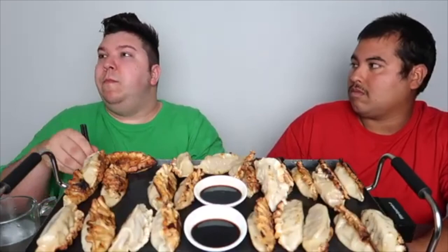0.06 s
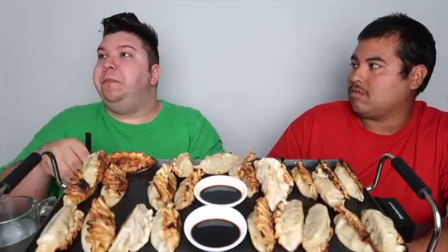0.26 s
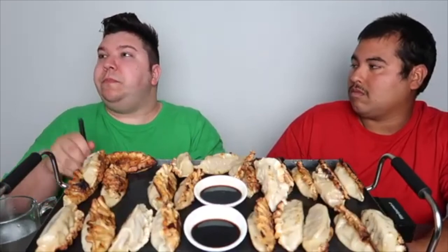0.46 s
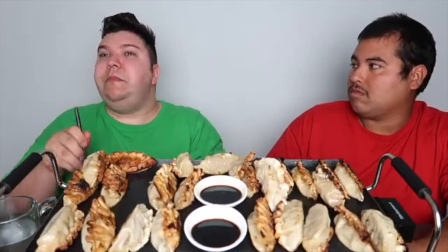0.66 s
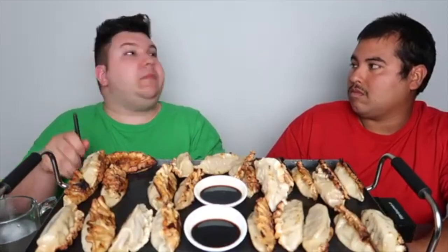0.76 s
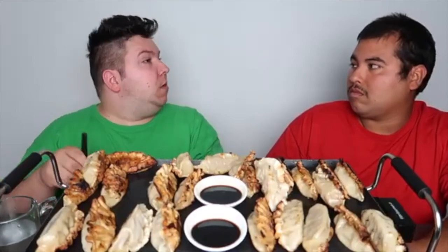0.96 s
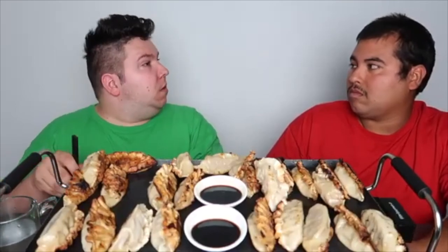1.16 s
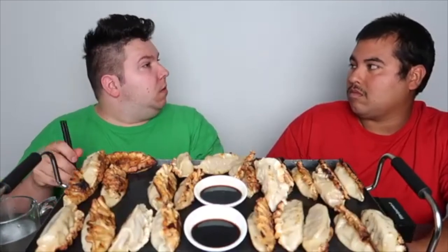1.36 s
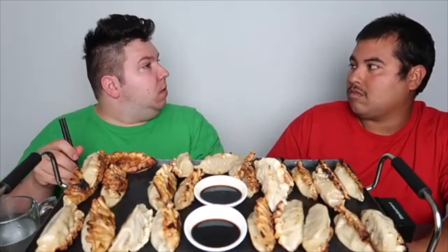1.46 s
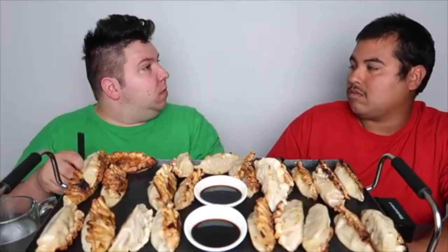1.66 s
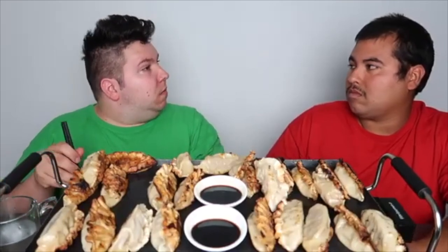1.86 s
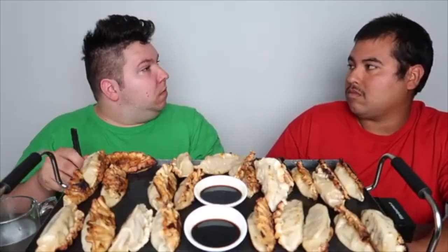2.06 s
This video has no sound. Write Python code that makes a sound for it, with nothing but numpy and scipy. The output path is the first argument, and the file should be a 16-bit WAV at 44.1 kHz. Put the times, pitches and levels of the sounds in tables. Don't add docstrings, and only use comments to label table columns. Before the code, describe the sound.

Chopsticks rapped on a dish, hollow clacks with a table thump in a small bare room

```python
import sys
import numpy as np
from scipy import signal
from scipy.fft import rfft, irfft, next_fast_len
from scipy.io import wavfile
from scipy.ndimage import uniform_filter1d

SR = 44100
rng = np.random.default_rng(int(sys.argv[2]) if len(sys.argv) > 2 else 0)


def log_audio(samples):
    frames = np.atleast_2d(samples).T
    limited = np.clip(frames, -1, 1)
    pcm = np.round(limited * 32767).astype(np.int16)
    wavfile.write(sys.argv[1], SR, pcm)


def voltage_ratio(level):
    return 10 ** (np.asarray(level, float) / 20)


N = 92610
EARLY = SR // 5
GRAZE_S = 0.006
STRIKE_SIZE = 8192


def evened(x):
    return x / np.sqrt(np.sum(x ** 2) + 1e-20)


def read(points, hz):
    f, value = np.transpose(points)
    return np.interp(np.log(hz + 1), np.log(f + 1), value)


def ring(modes, phase, size):
    t = np.arange(size) / SR
    total = np.zeros(size)
    for (hz, db, t60), p in zip(modes, phase):
        total += voltage_ratio(db - 60 * t / t60) * np.sin(2 * np.pi * (hz * t + p))
    return total


def causal(gain, size=4096):
    cepstrum = irfft(np.log(gain + 1e-5), size)
    cepstrum[1:size // 2] *= 2
    cepstrum[size // 2 + 1:] = 0
    return irfft(np.exp(rfft(cepstrum)), size)[:size // 2]


# [f/Hz, level/dB, time to fall 60 dB t/s]
STICK_MODES = [(2780, -6, .016), (4200, -2, .012), (5350, -1, .014), (6900, 1, .018), (7600, -1, .012),
               (8750, -1, .013), (10500, 0, .012), (10880, -1, .014), (12550, 0, .012), (12900, 0, .014),
               (14950, -6, .018)]


def sticks(db):
    spread_db, rise_s = 3.5, 0.0042
    chance = rng.random((2, len(STICK_MODES)))
    modes = []
    for (hz, level_db, t60), c in zip(STICK_MODES, chance[0]):
        modes.append((hz, level_db + spread_db * (2 * c - 1), t60))
    waking = np.minimum(np.arange(STRIKE_SIZE) / SR / rise_s, 1)
    return voltage_ratio(db) * ring(modes, chance[1], STRIKE_SIZE) * waking


# [f/Hz, level/dB]
BLOW_COLOUR = [(60, -19.5), (140, -14.5), (250, -2.5), (1000, 1.5), (3200, -2), (4000, -3), (8000, -13),
               (15000, -25)]


def rap(db, rim_db, thump_db, ring_db):
    graze_db = -22
    chatter, chatter_s = 0.083, 0.0034
    hz = np.fft.rfftfreq(4096, 1 / SR)

    def hump(centre_hz, width_hz):
        return 1 / (1 + abs((hz - centre_hz) / width_hz) ** 3)

    body = hump(1740, 620 * voltage_ratio(0.11 * (ring_db + 46)))
    body += voltage_ratio(rim_db) * hump(2803, 432)
    body += 2 * voltage_ratio(thump_db) * hump(340, 243)
    body += voltage_ratio(rim_db) * hump(859, 218)
    body += voltage_ratio(-22.5 + 0.4 * (ring_db + 49.5))
    blow = evened(causal(body * voltage_ratio(read(BLOW_COLOUR, hz))))

    t = np.arange(2048) / SR
    chance = rng.standard_normal((2, 2048))
    contacts = chatter * chance[0] * (abs(chance[0]) > 2) * np.exp(-t / chatter_s)
    contacts[0] = 1
    scrape = chance[1] * t ** 2 * (t < GRAZE_S)

    out = sticks(ring_db)
    out[:4095] += voltage_ratio(graze_db) * evened(np.convolve(blow, scrape))
    out[round(GRAZE_S * SR):][:4095] += evened(np.convolve(blow, contacts))
    return voltage_ratio(db + 21.5) * out


# [f/Hz, level/dB, time to fall 60 dB t/s]
WOKEN_TONES = [(167.2, -1, 0.3), (245.5, -2, 0.32), (346, -1, 0.29), (419.8, 4, 0.11), (494, -1, 0.23),
               (698.5, -4.5, .2), (888, -16, 0.47), (1164, -3.5, 0.33), (1326.5, 5, 0.19),
               (1375, -2.5, 0.16), (1636.5, 1.5, 0.22), (1840, -2.5, 0.31), (2179, 2, 0.11),
               (2380, -18, 0.18)]
# [f/Hz, time to fall 60 dB t/s]
ROOM_DECAY = [(150, 0.33), (400, 0.29), (1040, 0.29), (2760, 0.26), (7280, 0.22)]


def room():
    direct_db, tones_db, tail_db = -6, -8, 1.5
    rise_s, side_t60_s = 0.0013, 0.48
    size = SR // 2
    t = np.arange(size) / SR

    echoes = np.zeros((2, size))
    at = np.arange(40, size - 20, 20) + rng.integers(0, 20, (2, (size - 41) // 20))
    np.put_along_axis(echoes, at, rng.choice([-1., 1.], at.shape), 1)
    hz, frame_s, z = signal.stft(echoes, SR, nperseg=256)
    decay = voltage_ratio(-60 * frame_s / read(ROOM_DECAY, hz)[:, None])
    tail = signal.istft(z * decay, SR, nperseg=256)[1][:, :size]
    tail = tail * (1 - np.exp(-t / rise_s))
    tail = voltage_ratio(tail_db) * tail / np.linalg.norm(tail[0])

    tones = ring(WOKEN_TONES, rng.random(len(WOKEN_TONES)), size)
    tail[0] += voltage_ratio(tones_db) * evened(tones)
    tail[1] *= voltage_ratio(-60 * t / side_t60_s + 1.5)
    tail[0, 0] += voltage_ratio(direct_db)
    return tail


# [f/Hz, level/dB per Hz]
HUSH_COLOUR = [(15, -1.5), (25, -14), (167, 0.5), (513, -18), (949, -22), (1340, -18), (6000, -37),
               (11700, -49), (14900, -77)]
# [t/s, level/dB]
HUSH_GAIN = [(0.0, -46.5), (0.18, -38), (0.31, -50), (0.63, -54), (1.09, -47), (1.19, -46.5), (1.96, -44.5),
             (2.1, -38.5)]


def hush():
    patch_db, side_db, lift_db = 2, 6.5, -2
    hiss_follows, hiss_from_hz = 0.86, 1300
    frames, hz = N // 256 + 5, np.fft.rfftfreq(1024, 1 / SR)
    a, b, c, d, patches = rng.standard_normal((frames, 513, 5)).T
    patches = uniform_filter1d(patches, size=10, axis=0)
    patches = uniform_filter1d(patches, size=12, axis=1)
    colour_db = read(HUSH_COLOUR, hz)[:, None] + patch_db * patches / patches.std()
    z = np.array([a + 1j * b, voltage_ratio(side_db) * (c + 1j * d)]) * voltage_ratio(colour_db)

    level_db = np.interp(np.arange(frames) * 256 / SR, *np.transpose(HUSH_GAIN)) + 48
    follows = hiss_follows + (1 - hiss_follows) / (1 + (hz / hiss_from_hz) ** 2)
    steady_size = signal.istft(z[0], nperseg=1024, noverlap=768)[1].std()
    swelling = z * voltage_ratio(np.outer(follows, level_db))
    noise = signal.istft(swelling, nperseg=1024, noverlap=768)[1][:, :N]
    return noise / steady_size * voltage_ratio(lift_db - 47.5)


# [t/s, level/dB, dish rim level/dB, table thump level/dB, stick ring level/dB]
RAP_TIMES = [
    (-0.07, -5.5, -7, -2, -54.5),
    (0.2277, -9, -15.5, -7.5, -47.5),
    (0.518, -6, -7, -10.5, -53.5),
    (0.830, -8, 2, 5, -37),
    (1.183, -8.5, -9, -3, -46),
    (1.5743, -7, -22.5, -6.5, -67),
]
# [t/s, level/dB]
BRUSH_TIMES = [
    (0.219, -56),
    (1.088, -60),
    (1.130, -47),
    (1.137, -45),
]


def scene():
    catch_at_s, catch_db, catch_s = 0.227, 13.5, 0.011
    dry = np.zeros(N + EARLY + STRIKE_SIZE)
    for s, *levels in RAP_TIMES:
        dry[EARLY + round((s - GRAZE_S) * SR):][:STRIKE_SIZE] += rap(*levels)
    for s, db in BRUSH_TIMES:
        dry[EARLY + round(s * SR):][:STRIKE_SIZE] += sticks(db)
    in_room = signal.fftconvolve(dry[None], room(), axes=1)[:, EARLY:EARLY + N]
    since = np.arange(N) / SR - catch_at_s
    open_db = catch_db * np.exp(-np.maximum(since, 0) / catch_s) * (since > -0.02)
    return in_room * voltage_ratio(open_db) + hush()


def low_pass(x):
    return signal.sosfilt(signal.butter(12, 15050, fs=SR, output="sos"), x)


# [f/Hz, level/dB]
LEAN = [(60, 2.5), (240, -0.5), (930, -1), (3670, 1), (14400, -0.5)]
# [f/Hz, level/dB]
SIDE_LEVEL = [(30, -18), (70, -21), (150, -28), (300, -29), (600, -20), (1200, -14), (2500, -11),
              (5000, -1), (13000, 4)]
# [f/Hz, share 0-1]
TIED_SHARE = [(60, 0.8), (500, 0.1), (3000, 0), (8000, 0)]


def record(dry):
    edge_hz, ceiling = 15100, 1.0
    size = next_fast_len(N + 4096)
    hz = np.fft.rfftfreq(size, 1 / SR)
    mid, other = rfft(dry, size)
    tied = np.clip(read(TIED_SHARE, hz), 0, 1)
    side = voltage_ratio(read(SIDE_LEVEL, hz)) * (1j * tied * mid + np.sqrt(1 - tied ** 2) * other)
    band = 1 / (1 + (hz / edge_hz) ** 80)
    half_lean = voltage_ratio(read(LEAN, hz) / 2)
    left = (mid + side) * band * half_lean
    right = (mid - side) * band / half_lean
    pair = irfft(np.array([left, right]), size)[:, :N]
    return low_pass(np.clip(pair, -ceiling, ceiling))


dry = scene()
out = record(dry)
log_audio(out)
```